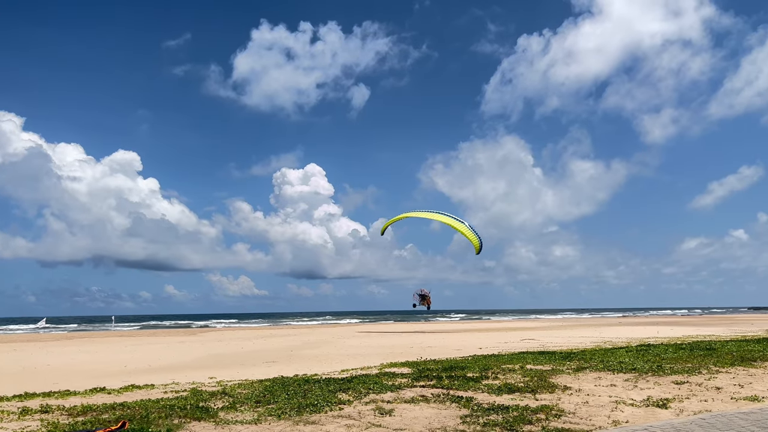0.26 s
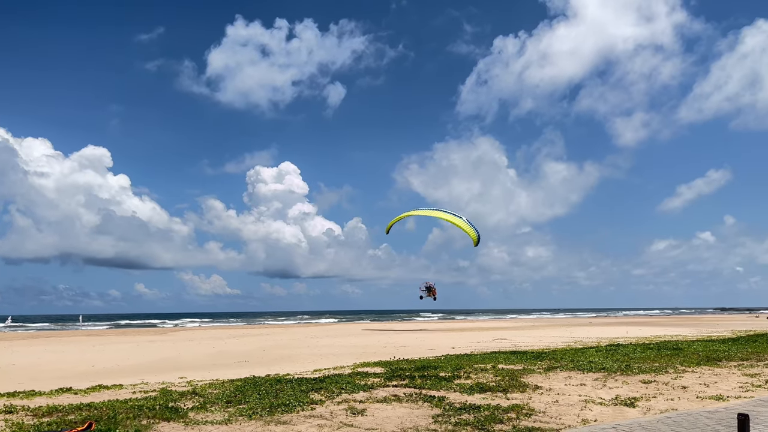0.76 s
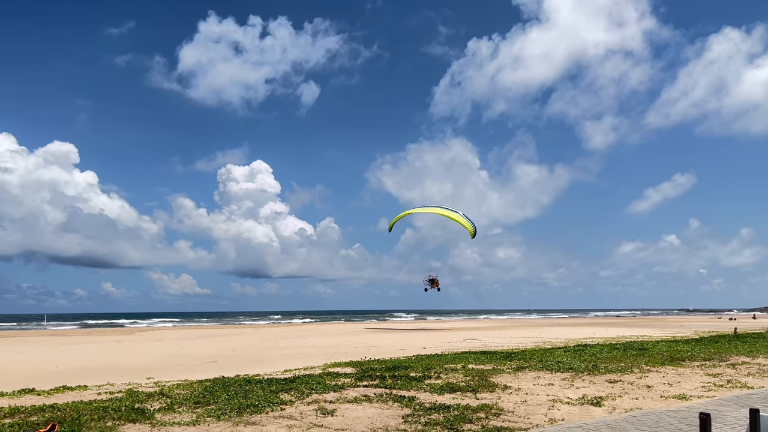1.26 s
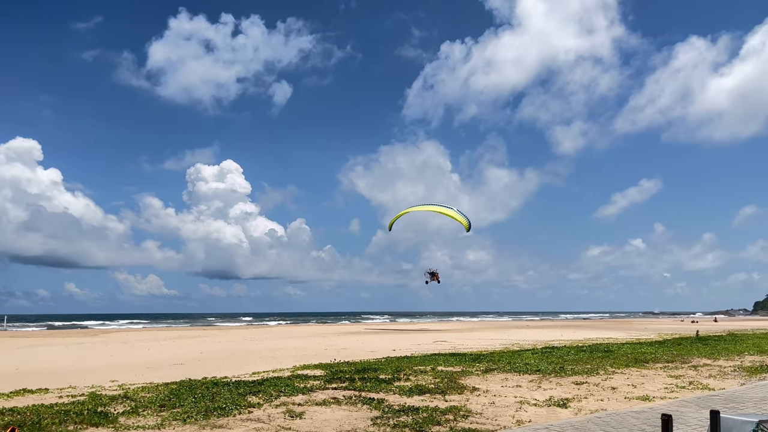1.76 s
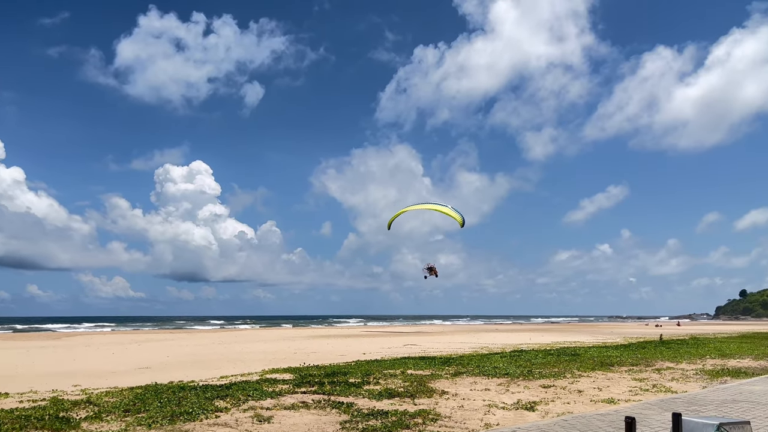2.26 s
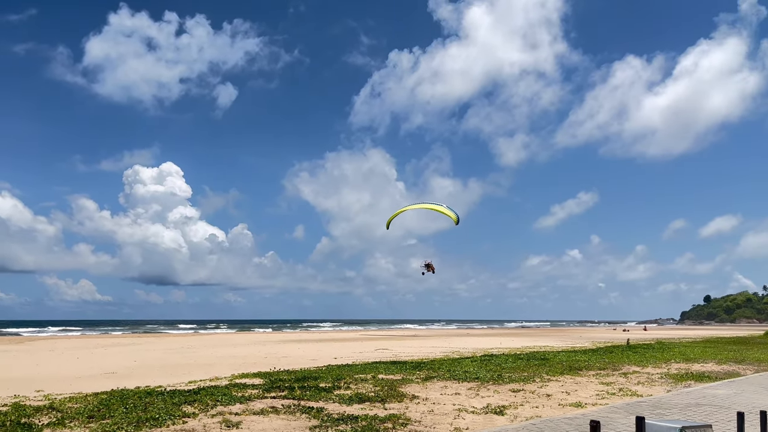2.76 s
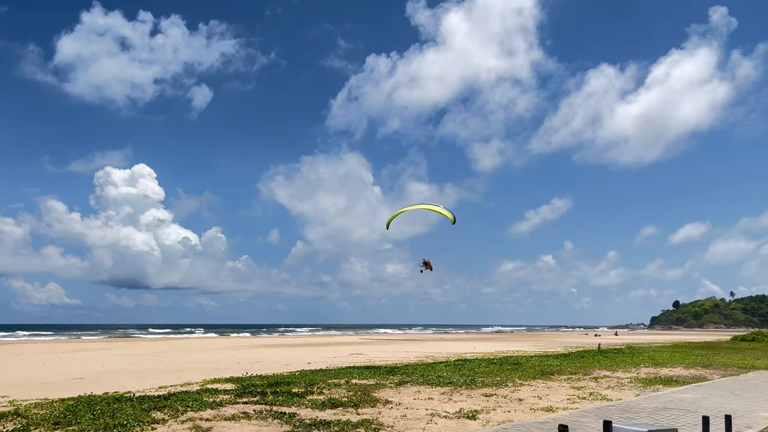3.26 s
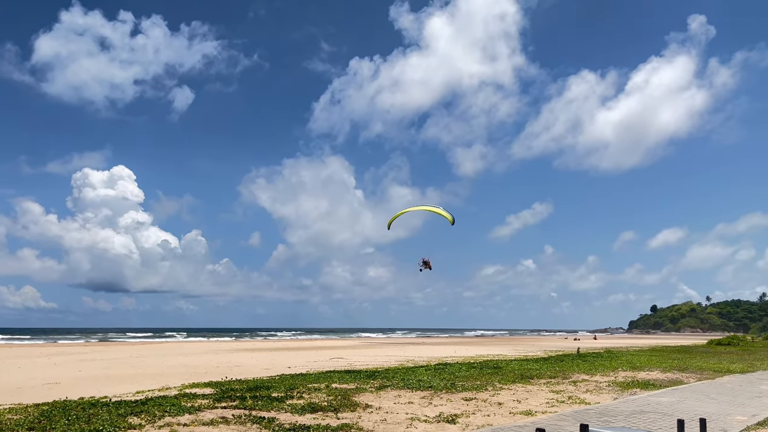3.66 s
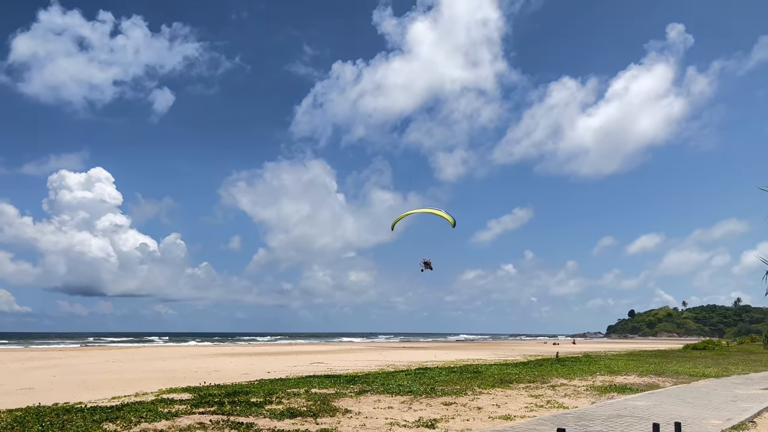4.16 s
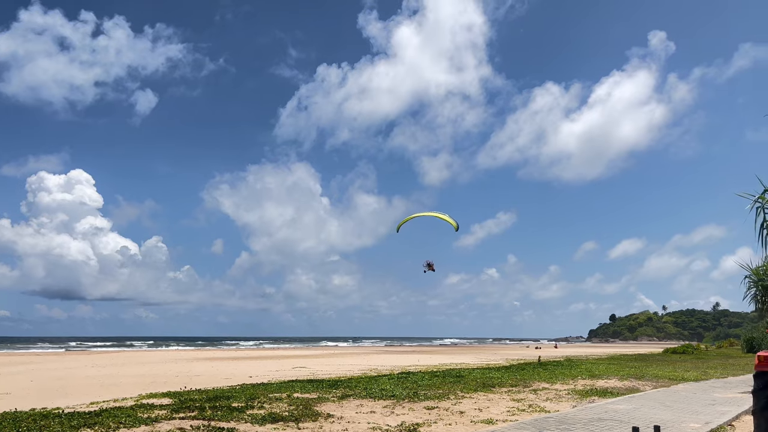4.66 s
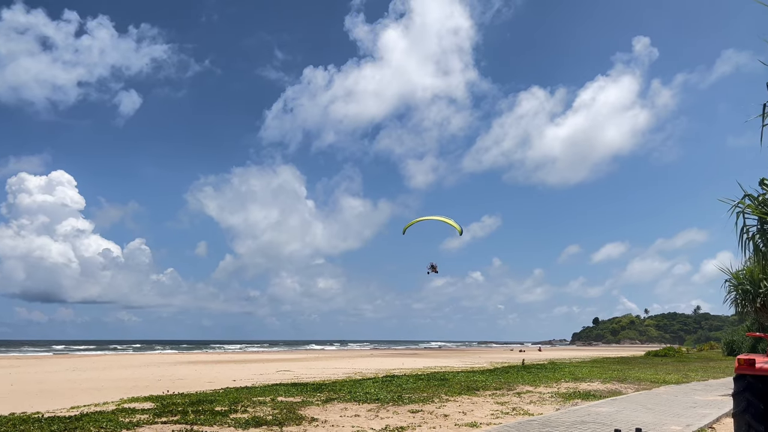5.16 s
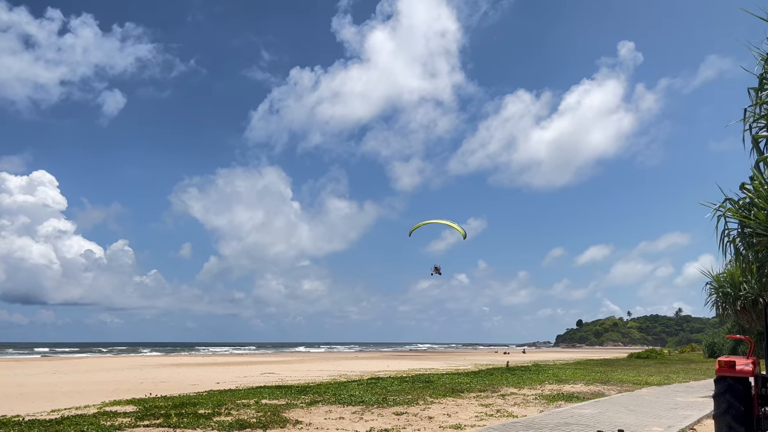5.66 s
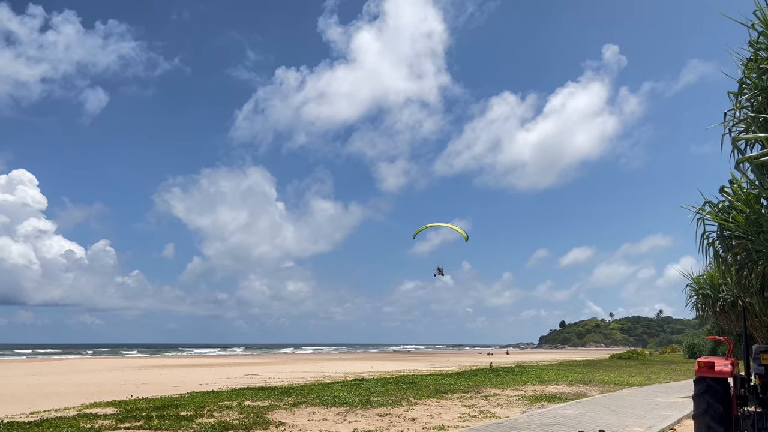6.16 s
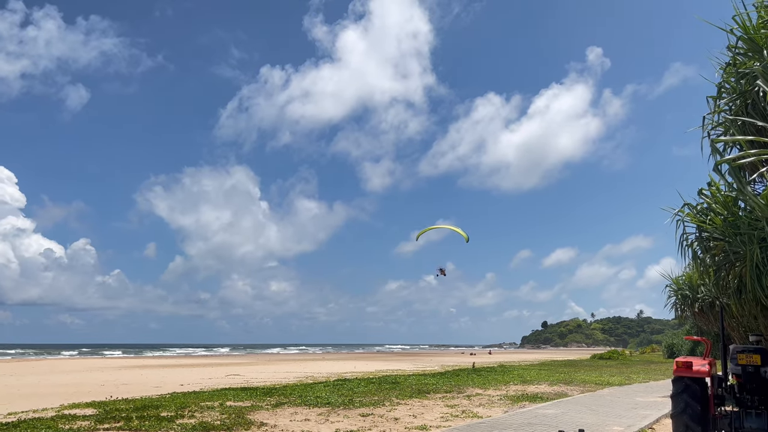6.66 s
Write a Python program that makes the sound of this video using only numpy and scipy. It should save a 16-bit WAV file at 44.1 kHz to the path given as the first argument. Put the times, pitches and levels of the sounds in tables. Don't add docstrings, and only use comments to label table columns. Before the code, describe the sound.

A small two-stroke aircraft engine and propeller buzz steadily away over a beach, with wind bumping the microphone and faint surf behind.

```python
import sys
import numpy as np
from scipy import signal
from scipy.fft import rfft, irfft, next_fast_len
from scipy.io import wavfile
from scipy.ndimage import uniform_filter1d, map_coordinates

SR = 44100
rng = np.random.default_rng(int(sys.argv[2]) if len(sys.argv) > 2 else 0)


def master(y):
    cut = np.clip(np.atleast_2d(y).T, -1, 1)
    pcm = np.round(cut * 32767)
    wavfile.write(sys.argv[1], SR, pcm.astype(np.int16))


def gain_from_db(level_db):
    decades = np.asarray(level_db, float) / 20
    return 10 ** decades


N = 304290
TIME = np.arange(N) / SR
TURN_S = 5.3

# time_s, engine_level_db, silencer_thump_db
HEARD_LEVELS = [(0, -30.5, -30.5), (.2, -33, -33.5), (.5, -34, -32.5), (.8, -33, -29.5),
                (1.0, -33.5, -34.5), (1.45, -34, -30), (1.9, -32.5, -33), (2.5, -33.5, -35.5),
                (2.85, -33, -31), (3.15, -32, -29.5), (3.4, -31.5, -54), (4.2, -34, -34), (4.8, -33.5, -37),
                (5.2, -31.5, -56), (5.5, -32.5, -52), (6.0, -33, -42), (6.9, -35.5, -59)]


def unit(x):
    return x / np.sqrt(np.mean(np.abs(x) ** 2) + 1e-20)


def along(points, hz):
    f, *cols = np.transpose(points)
    return [np.interp(np.log(hz + 1), np.log(f + 1), c) for c in cols]


def curves(rows, t=TIME):
    s, *cols = np.transpose(rows)
    return [np.interp(t, s, c) for c in cols]


def wobble(rate):
    knots = rng.standard_normal(int(N * 300 / SR) + 4)
    return map_coordinates(knots, [TIME * np.clip(rate, .1, 299)])


def coloured(x, spectrum):
    m = next_fast_len(N)
    gain = gain_from_db(along(spectrum, np.fft.rfftfreq(m, 1 / SR))[0])
    return unit(irfft(rfft(x, m) * gain, m)[:N])


def noise(spectrum):
    return coloured(rng.standard_normal(N), spectrum)


def rings(rows, cycles):
    out = np.zeros(N + SR)
    for s, db, pitch_hz in rows:
        age = TIME[:SR // 20] * pitch_hz
        swing = gain_from_db(db) * np.exp(-age / cycles) * np.sin(2 * np.pi * age)
        out[round(s * SR):][:len(age)] += swing
    return out[:N]


def frames(x):
    return signal.stft(x, SR, nperseg=1024, noverlap=768)


def patches(shape, bins, steps):
    field = rng.standard_normal((2, *shape))
    for width, axis in ((bins, 1), (bins, 1), (steps, 2), (steps, 2)):
        field = uniform_filter1d(field, width, axis)
    return unit(field[0] + 1j * field[1])


def ports(z, hz, other, alike=1.0):
    # pitch_hz, likeness (0-1), left_lead_radians, left_over_right_db
    port_pair = [(100, .93, .2, 0), (550, .76, .5, 1.5), (850, .85, .5, .3), (1200, .48, .05, 4.5),
                 (1600, .3, 1.5, 1), (2000, .88, 0, 2.4), (3000, .75, .8, 1.9), (5000, .6, .2, 1.6),
                 (7300, .8, -1.9, .6), (8000, .96, -3.0, 0), (9150, .97, -3.4, 0), (11000, .99, -6.1, 0),
                 (12600, .99, -6.5, 0), (15000, .97, -9.3, 0)]
    same, lead, balance_db = [c[:, None] for c in along(port_pair, hz)]
    turn = np.arccos(np.clip(alike * same, 0, 1)) / 2
    gain = gain_from_db(balance_db / 2)
    shift = np.exp(1j * lead / 2)
    left = (np.cos(turn) * z * shift + np.sin(turn) * other) * gain
    right = (np.cos(turn) * z / shift - np.sin(turn) * other) / gain
    return signal.istft(np.array([left, right]), SR, nperseg=1024, noverlap=768)[1][:, :N]


def surf():
    # pitch_hz, level_db (per Hz)
    surf_colour = [(35, -47), (60, -26), (202, -4.5), (486, -18.5), (848, -5.5), (1010, -21.5),
                   (1840, -19.5), (7000, -31.5), (9100, -53), (15400, -120)]
    # pitch_hz, level_db (per Hz)
    breaker_colour = [(200, -35), (400, -7), (600, -1), (850, -1.5), (1300, -31), (3000, -48)]
    # start_s, peak_db, pitch_hz
    water_slaps = [
        (5.914, -21, 818),
        (6.145, -14.5, 830),
        (6.374, -22, 650),
        (6.451, -19, 810),
        (6.536, -15, 700),
        (6.724, -19, 800),
        (6.82, -22, 514),
        (6.876, -18, 525),
    ]
    breaker_s, breaker_db, half_length_s = 6.5, -36.5, 1
    boom = gain_from_db(breaker_db + 2.0 * wobble(37)) * np.exp(-((TIME - breaker_s) / half_length_s) ** 2)
    swell_db = 3 * wobble(.8)
    wash = gain_from_db(-40.5 + swell_db)
    water = [wash * noise(surf_colour) + boom * noise(breaker_colour) for _ in range(2)]
    hz, t, z = frames(np.array(water))
    z = z * gain_from_db(1.4 * patches(z.shape[1:], bins=8, steps=10).real)
    slaps = gain_from_db(-1.5) * rings(water_slaps, cycles=2.3)
    z[0] += frames(slaps)[2]
    return ports(z[0], hz, z[1], alike=0.77)


def gusts():
    # time_s, buffet_db
    breeze_levels = [(0, -36.5), (.95, -41.5), (1.2, -48), (1.5, -43.5), (2.3, -41.5), (3.0, -40.5),
                     (3.5, -35), (3.7, -39.5), (4.3, -45), (5.2, -34), (6.0, -37), (6.45, -41.5),
                     (6.9, -44)]
    # peak_s, peak_db, half_length_s, brightness_db
    gust_swells = [(0.206, -43, 0.033, 12), (0.855, -35.5, 0.059, -24), (1.41, -36, 0.025, -18),
                   (2.07, -39, 0.044, -10), (2.643, -36, 0.016, -22), (2.916, -35.5, 0.049, -9),
                   (3.19, -44.5, 0.12, 10), (3.646, -26.5, 0.042, -9), (3.756, -31, 0.026, 5),
                   (3.87, -31, 0.054, -2), (3.976, -34, 0.042, 7), (4.133, -33, 0.043, -17),
                   (4.313, -29, 0.031, 4), (4.447, -33, 0.12, -2), (4.662, -33, 0.12, -28),
                   (4.852, -33, 0.055, -28), (4.967, -19.5, 0.037, -22), (5.065, -18.5, 0.034, 0.5),
                   (5.307, -32, 0.048, -6), (5.433, -32.5, 0.085, 11.5), (5.542, -39.5, 0.021, 16.5),
                   (5.726, -38, 0.053, 14.5), (5.82, -26, 0.011, -17), (5.914, -31, 0.024, -4)]
    t = TIME[::64]
    s, db, half_s, bright_db = np.transpose(gust_swells)[:, :, None]
    breeze = gain_from_db(curves(breeze_levels, t)[0])
    swells = gain_from_db(db) * np.exp(-((t - s) / half_s) ** 2)
    rumble = breeze + swells.sum(axis=0)
    bright = breeze * gain_from_db(8.5) + (swells * gain_from_db(bright_db)).sum(axis=0)
    return np.interp(TIME, t, rumble), np.interp(TIME, t, bright)


def wind():
    # pitch_hz, level_db (per Hz)
    buffet_colour = [(20, -43), (40, -9), (65, -1.5), (100, -4), (200, -16), (400, -25.5), (800, -43.5),
                     (1500, -120)]
    # start_s, peak_db, pitch_hz
    quick_bumps = [(4.954, -8.5, 316), (4.963, -12.5, 166), (5.023, -10, 256), (5.03, -4.5, 225),
                   (5.05, -13, 282), (5.063, -2, 199), (5.379, -4.5, 314), (5.4, -8, 282),
                   (5.419, -11.5, 236), (5.44, -10, 280), (5.452, -9, 319), (5.474, -7, 367),
                   (5.491, -5.5, 357), (5.497, -11, 346), (5.521, -8, 363), (5.545, -10.5, 220),
                   (5.714, -19, 192), (5.744, -31, 205)]
    # start_s, peak_db, pitch_hz
    slow_thuds = [(2.61, -15, 113), (2.764, -21, 112), (2.815, -15.5, 108), (3.626, -34, 56),
                  (3.717, -27, 77), (4.283, -13.5, 78.5), (4.67, -15.5, 68.6), (4.966, -12.5, 68),
                  (4.979, -13, 68), (5.039, -8, 78.4), (5.381, -10, 82), (5.426, -18, 75), (5.461, -17, 75),
                  (5.706, -16, 81.4), (5.803, -21, 104)]
    rumble, bright = gusts()
    body_colour = [(60, -27)] + [(f, db + 6 * np.log2(f / 100)) for f, db in buffet_colour[3:]]
    lumps = gain_from_db(0.93 * wobble(25))
    air = np.array([lumps * (rumble * noise(buffet_colour) + bright * gain_from_db(-8.0) * noise(body_colour))
                    for _ in range(2)])
    for s, db, pitch_hz in [*quick_bumps, *slow_thuds]:
        start = round(s * SR)
        age = TIME[:SR // 4] * pitch_hz
        envelope = (1 - np.exp(-age / 0.38)) ** 2 * np.exp(-age / 1.03)
        swing = np.sin(2 * np.pi * age * np.exp(-.03 * age))
        air[0, start:start + len(age)] += gain_from_db(db + 5.0) * envelope * swing
    hz, t, z = frames(air)
    return ports(z[0], hz, z[1], alike=0.59)


def stack(orders, cycles, scatter=0.):
    # time_s, view (0 side on, 1 quartering, 2 from behind, 3 banked)
    facing_side = [
        (0.7, 0),
        (2.3, 1),
        (3.8, 2),
        (5.7, 3),
    ]
    shift = scatter * rng.standard_normal(len(orders))
    view, = curves(facing_side)
    facing = np.clip(1 - np.abs(view - np.arange(4)[:, None]), 0, 1)
    quarter = np.pi / 2 * (scatter > 0)
    total = 0
    for (k, *db), p in zip(orders, shift):
        level = gain_from_db(db) @ facing if len(db) > 1 else gain_from_db(db[0])
        total = total + level * np.cos(2 * np.pi * round(k) * cycles - p - quarter)
    return total


def propeller(turns):
    # multiple of the blade rate, level_db
    blade_harmonics = [(1, -7.5), (2, 0.5), (3, -12), (4, 0), (5, -15), (6, -9), (7, -4.5), (8, -5.5)]
    passes_per_firing = .86
    banked_db = -8.5 * np.clip(2 * (TIME - TURN_S) + 1, 0, 1)
    level_db = -39.5 - 0.44 * TIME + banked_db
    passes = passes_per_firing * turns + .03 * wobble(7)
    return gain_from_db(level_db + 1.2 * wobble(5)) * stack(blade_harmonics, passes) * np.sqrt(2)


def blade_tip_hiss():
    # pitch_hz, level_db (per Hz)
    tip_colour = [(3000, -42), (5000, -22), (7000, 3), (9000, 2), (11000, -2.5), (14000, -5), (16000, -27)]
    # time_s, level_db
    tip_levels = [(0, -21.5), (.4, -18), (.75, -22), (1.3, -22.5), (1.8, -22.5), (2.3, -27.5), (2.8, -24.5),
                  (3.2, -25.5), (3.8, -23), (4.3, -25), (4.8, -28), (5.2, -29.5), (5.6, -26), (6.2, -32),
                  (6.9, -27)]
    return gain_from_db(curves(tip_levels)[0] + 0.5 * wobble(4.36) + 1.1 * wobble(11)) * noise(tip_colour)


def gear_whine(turns):
    # time_s, level_db
    whine_levels = [(0, -67), (.7, -54), (1, -54), (2.5, -59), (4.5, -51), (5, -62), (6.9, -75)]
    teeth_per_firing = 32.67
    level = gain_from_db(curves(whine_levels)[0] + 2.3 * wobble(7.5))
    return level * np.sqrt(2) * np.sin(2 * np.pi * teeth_per_firing * turns)


def silencer_thump(cycles):
    first_db = curves(HEARD_LEVELS)[1]
    second_db = -37 + 0.32 * TIME - 5.5 * np.clip(TIME - TURN_S, 0, 1)
    ahead = cycles + 1 / 4
    first = gain_from_db(first_db) * stack([(1, 0.43)], ahead)
    second = gain_from_db(second_db) * stack([(2, 1.55)], ahead + 1 / 8)
    return gain_from_db(0.15 * wobble(16.0) + 1.75 * wobble(20)) * (first + second)


def hard_cracks():
    # start_s, peak_db
    hard_firings = [(0.5227, -24.5), (0.7477, -15), (0.9457, -18.5), (1.267, -20), (1.3902, -18),
                    (1.5229, -18), (1.6656, -25), (1.8951, -15), (1.9599, -30), (2.16, -21),
                    (2.7217, -20.5), (2.8649, -18), (2.9223, -35), (3.256, -35), (3.7424, -19),
                    (4.0382, -25), (4.4104, -18), (4.5835, -19), (4.6977, -22), (5.1856, -18),
                    (5.2619, -18), (5.4006, -21), (5.4899, -33), (5.9284, -16)]
    ring_hz, decay_s = 1760, 0.00077
    rows = [(s, db - 2.5, ring_hz * k) for s, db in hard_firings for k in (1, 1.7)]
    return rings(rows, decay_s * ring_hz)


def gas_blast(cycles):
    # pitch_hz, level_db (per Hz)
    blast_colour = [(200, -40), (400, -12), (800, -6), (1300, -7.5), (1800, -6.5), (2500, -13.5),
                    (4000, -15.5), (5200, -24), (7000, -28.5), (9000, -28.5), (16000, -71)]
    # time_s, level_db
    blast_levels = [(0, -1.5), (.8, -3.5), (1.5, -3), (2.3, -4.5), (3.1, -4), (3.9, -2.5), (4.6, -2),
                    (5.3, -3), (6, -5), (6.9, -3.5)]
    force = gain_from_db(2.4 * wobble(70) + .8 * wobble(18))
    burst = np.exp(36.0 * (np.cos(2 * np.pi * (cycles - .04)) - 1))
    gas = coloured((1.1 + 1.53 * force * burst) * rng.standard_normal(N), blast_colour)
    return gain_from_db(curves(blast_levels)[0]) * gas


def exhaust_buzz(cycles):
    # multiple of the firing rate, side_on_db, quartering_db, behind_db, banked_db
    exhaust_harmonics = [(3, -4, -10, -5, -12.5), (4, -10.5, -7, -10.5, -24), (5, -9.5, -12, -7.5, -6.5),
                         (6, -7.5, -6, -7.5, -13.5), (7, -33, -17, -8.5, -13), (8, -2, -2.5, -1.5, -5),
                         (9, -7.5, -9, -14, -18), (10, -50, -31, -57, -19.5), (11, -5.5, -14, -7.5, -6),
                         (12, -2, -7.5, -5, -14), (13, -4, -6.5, -12, -11.5),
                         (14, -2.5, -12.5, -11.5, -12.5), (15, -8, -23, -7, -8.5),
                         (16, -5, -9.5, -15, -11.5), (17, -11.5, -14, -11.5, -9), (18, -38, -15, -17, -32),
                         (19, -16.5, -13.5, -21, -13), (20, -15, -26, -16, -38),
                         (21, -30, -25, -11.5, -23.5), (22, -47, -38, -21, -19)]
    strength = gain_from_db(1.2 * wobble(100) + .6 * wobble(12))
    last, last_db = exhaust_harmonics[-1][0], exhaust_harmonics[-1][-1]
    upper = [(last + k, last_db + 1.5 - 0.45 * k) for k in range(1, 31)]
    return gain_from_db(-1.0) * strength * unit(stack(list(exhaust_harmonics) + upper, cycles, scatter=.85))


def engine():
    # time_s, firings_per_s
    engine_speed = [(0, 107.7), (.6, 106.5), (1.2, 105.6), (2.1, 105.0), (3.9, 104.9), (4.5, 104.4),
                    (5.4, 105.0), (6.0, 104.4), (6.3, 103.1), (6.9, 101.8)]
    turns = np.cumsum(curves(engine_speed)[0]) / SR
    blur = np.interp(TIME, [5, 6.2], [1, 2.3])
    cycles = turns + blur * (.003 * wobble(60) + .015 * wobble(6))
    level_db = curves(HEARD_LEVELS)[0]
    firing = gain_from_db(level_db) * (exhaust_buzz(cycles) + gas_blast(cycles) + blade_tip_hiss())
    return firing + silencer_thump(cycles) + propeller(turns) + hard_cracks() + gear_whine(turns)


def flyover():
    # time_s, lag_ms, strength (0-1)
    sand_echo = [(0, 0.28, 0.54), (1, 0.38, 0.52), (1.7, 0.45, 0.34), (2.4, 0.6, 0.61), (3.2, 0.7, 0.35),
                 (4, 0.78, 0.39), (4.8, 0.79, 0.31), (5.6, .82, 0.33), (6.9, 0.76, 0.02)]
    # time_s, treble_tilt_db
    beam_tilt = [(0, 0), (.5, 0.6), (1, 0.2), (1.4, 0.9), (1.9, 0.7), (2.2, 0.5), (2.5, 1), (3.1, .5),
                 (3.4, -0.5), (3.9, 1.3), (4.3, 0.5), (4.7, -0.9), (5.2, 0.5), (5.7, 0), (6.3, 0.8),
                 (6.9, 0)]
    hz, t, z = frames(engine())
    pitch = hz[:, None]
    lag_ms, echo = np.clip(curves(sand_echo, t), 0, .95)
    share = echo / (1 + (pitch / 3500) ** 3)
    bounce = share * np.exp(-1j * (2 * np.pi * pitch * lag_ms / 1000 + .4 * np.pi))
    treble_db = curves(beam_tilt, t)[0] - 2 * np.clip((t - TURN_S) / .05, 0, 1)
    octaves = np.clip(np.log2(pitch / 1500 + 1e-3), 0, 1.8)
    z = z * (1 + bounce) * gain_from_db(treble_db * octaves / 0.89)
    far = np.interp(t, [4.8, 6.1], [.17, .28])
    short = np.clip(pitch / 800, .55, 1)
    slow = 0.26 * patches(z.shape, bins=4, steps=22)
    grains = far * patches(z.shape, bins=6, steps=4)
    shimmer = unit(1 + short * (slow + grains))
    return ports(z * shimmer, hz, z * patches(z.shape, bins=3, steps=18))


def scene():
    return surf() + wind() + flyover()


def roll_off(x):
    return signal.sosfilt(signal.butter(12, 15800, fs=SR, output="sos"), x)


def record(dry):
    limit = .6
    soft = dry / (1 + np.abs(dry / limit) ** 4) ** (1 / 4)
    return roll_off(soft)


dry = scene()
out = record(dry)
master(out)
```